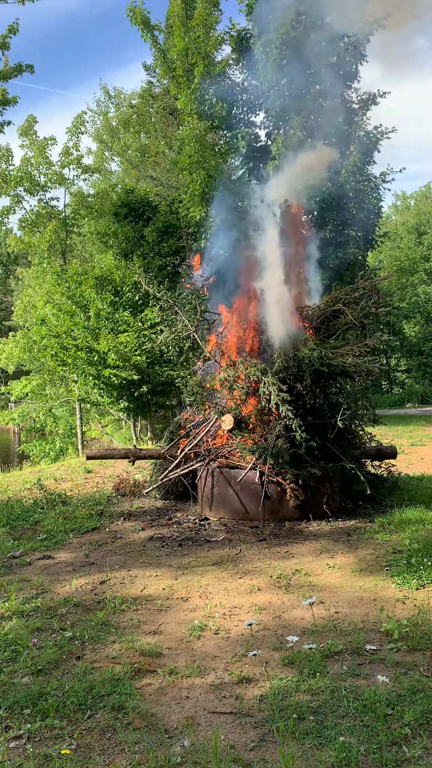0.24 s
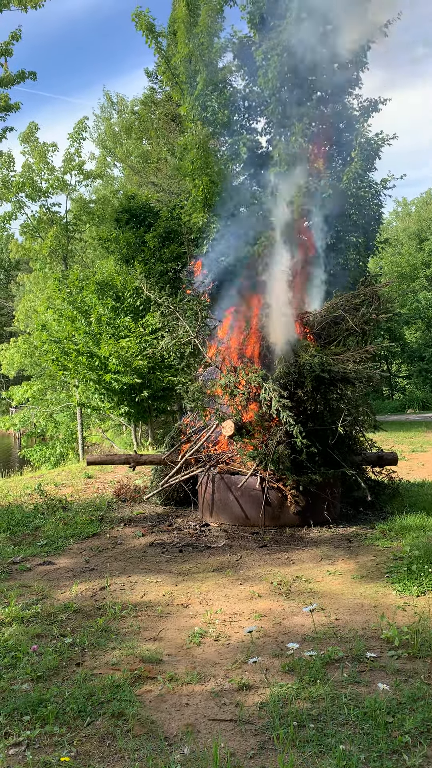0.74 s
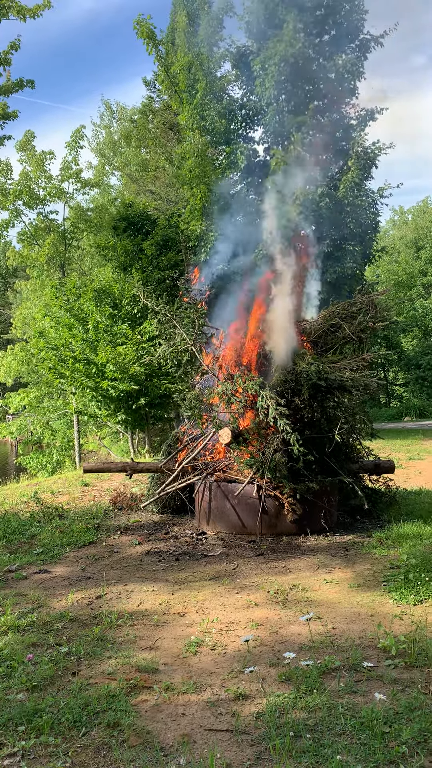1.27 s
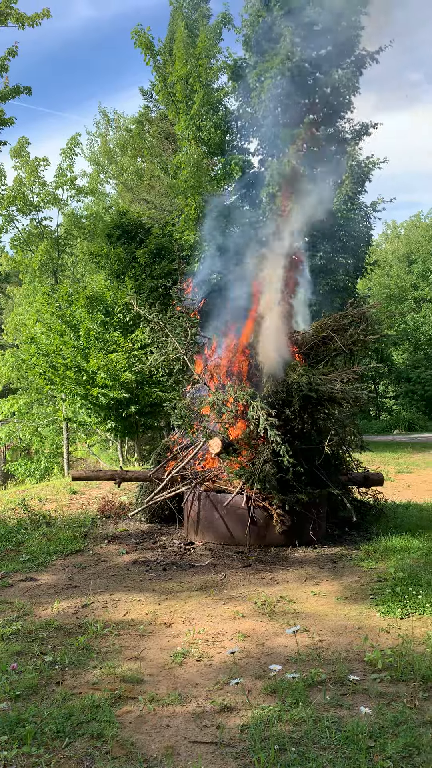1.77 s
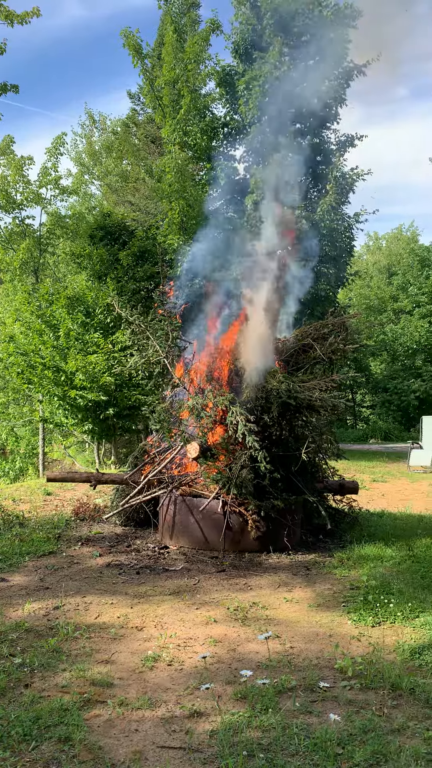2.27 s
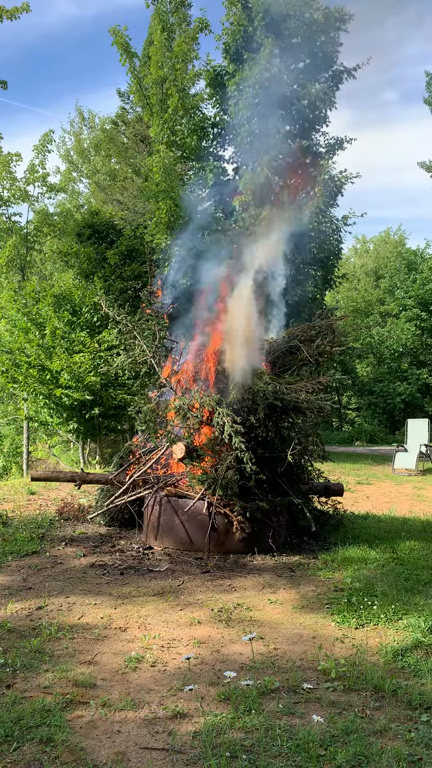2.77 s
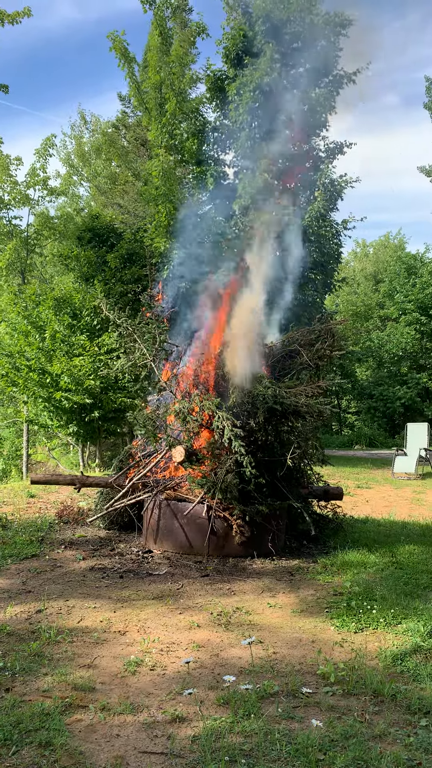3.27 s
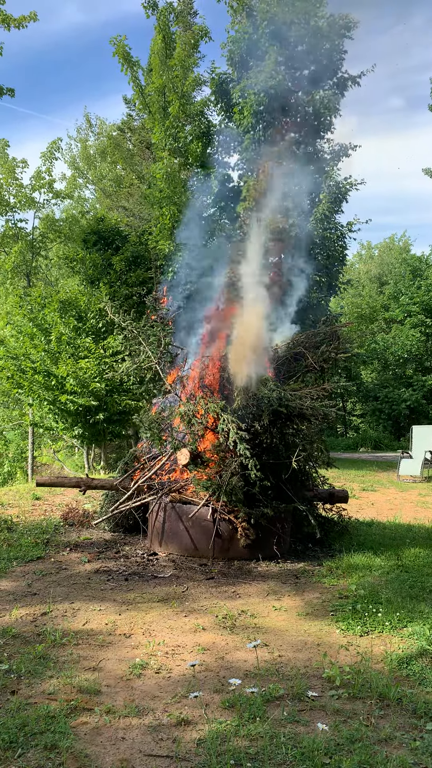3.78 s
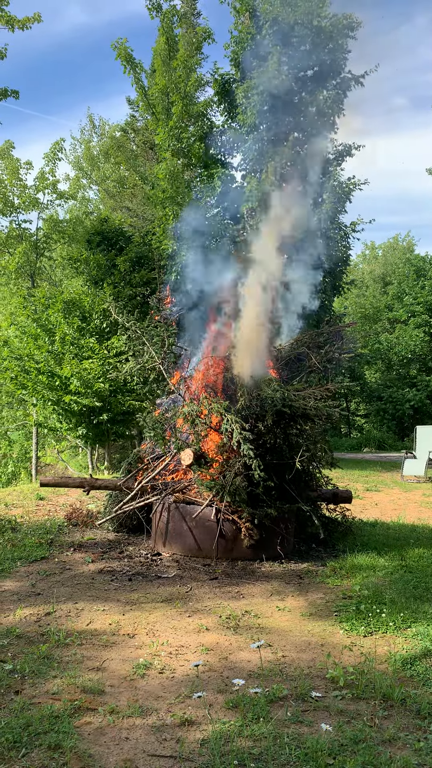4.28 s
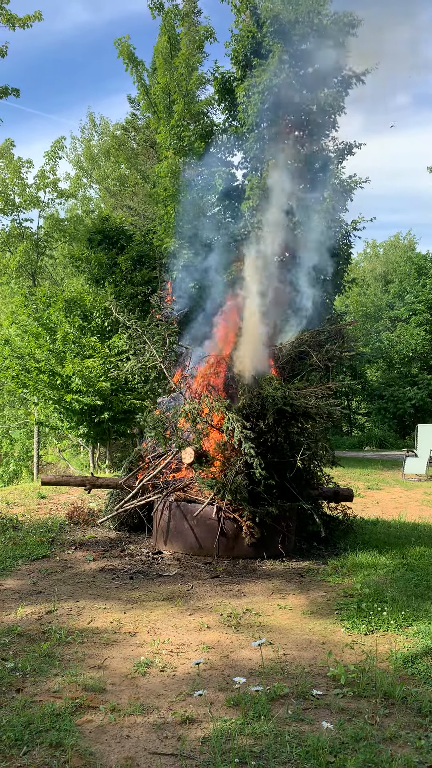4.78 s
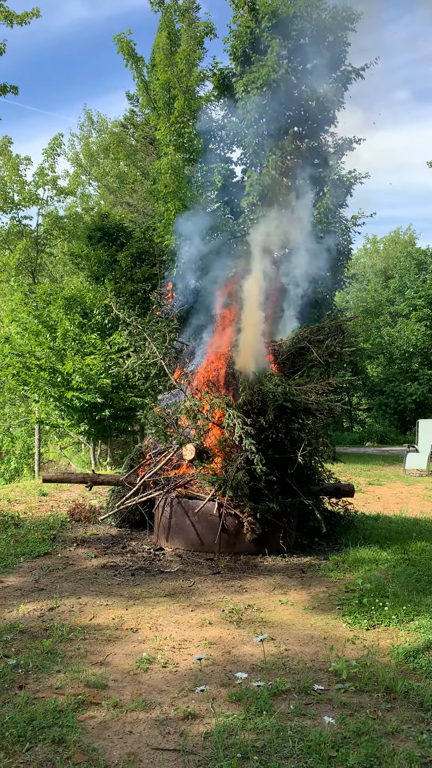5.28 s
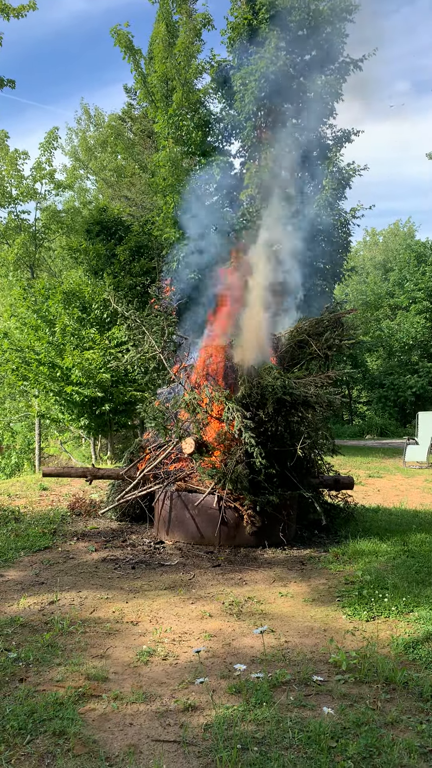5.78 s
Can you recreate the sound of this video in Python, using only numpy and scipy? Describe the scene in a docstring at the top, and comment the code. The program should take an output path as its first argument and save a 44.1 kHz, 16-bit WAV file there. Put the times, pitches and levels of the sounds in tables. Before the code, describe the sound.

Dense, bright crackling and sharp twig snaps come from an outdoor brush fire, with a soft, low rush of flames underneath.

```python
"""A tall pile of green brush burns on open ground, several metres away, for six seconds.
From the start the flames make a low, surging rush under a dense, bright crackle of bursting needles
and sizzling sap. Twigs snap all the way through as their fibres tear. Near 3 s comes a lower-pitched
crack, and at 3.7 s a thick stick gives the loudest woody pop. Every crack scatters in the pile and
bounces off the ground on its way to a pair of close microphone ports."""
import sys
import numpy as np
from scipy import signal
from scipy.fft import rfft, irfft, next_fast_len
from scipy.io import wavfile

SR = 44100
rng = np.random.default_rng(int(sys.argv[2]) if len(sys.argv) > 2 else 0)


def transcribe(signal):
    """Save signal, clipped to [-1, 1], as a 16-bit WAV file at the path in sys.argv[1]."""
    frames = np.atleast_2d(signal).T
    limited = np.clip(frames, -1, 1)
    pcm = np.round(limited * 32767).astype(np.int16)
    wavfile.write(sys.argv[1], SR, pcm)


N = 265878
TIME = np.arange(N) / SR
FFT_SIZE = next_fast_len(N + 4096)
HZ = np.maximum(np.arange(FFT_SIZE // 2 + 1) * SR / FFT_SIZE, 1)

# The tone of the flames. Each row: frequency in Hz, relative level in dB.
RUSH_EQ = [(12, -31), (20, -30), (32, -23), (45, -5), (72, 1.5), (105, -0.6), (165, -3.5), (280, -9.0),
           (430, -15.5), (720, -13), (950, -18.5), (1500, -27.5), (2600, -28.5), (16000, -59)]
# Loudness of the background crackle bed, with swells, lulls and brief dips just before some sharp snaps.
# Each row: time in seconds, relative level in dB.
BED_LEVEL = [(0.0, -36.5), (0.18, -39), (0.39, -36), (0.45, -40), (0.48, -37), (0.57, -36), (0.63, -42),
             (0.7, -35.5), (0.81, -43), (0.84, -35.5), (1.33, -36.5), (1.42, -36.5), (1.48, -38),
             (1.54, -41), (1.6, -36), (1.71, -37), (1.74, -39.5), (1.84, -35), (1.87, -39), (2.04, -33.5),
             (2.07, -36.5), (2.39, -35.5), (2.57, -38), (2.6, -34), (2.65, -37.5), (2.81, -35), (2.87, -38),
             (2.99, -32), (3.1, -38), (3.32, -34), (3.37, -40.0), (3.52, -33.5), (3.55, -37.5), (3.7, -36),
             (3.82, -40.5), (3.93, -38), (3.97, -35), (4.19, -36), (4.33, -35.5), (4.71, -37),
             (4.79, -34.5), (4.94, -36.5), (5.01, -44), (5.04, -35), (5.16, -39), (5.33, -35.5),
             (5.47, -39), (5.51, -35.5), (5.85, -35.5), (5.88, -41.5), (5.94, -35), (6.03, -34)]
# The featured snaps. Each row: time in seconds, relative crack level in dB, crack pitch in Hz,
# relative knock level in dB, fracture length in seconds.
SNAP_CUES = [(0.0347, -28, 7000, -54, .00015), (0.0853, -27.5, 12500, -48, .0009),
             (0.1042, -29.5, 12000, -54, .0001), (0.218, -27, 13000, -39, 0.00034),
             (.245, -28, 14000, -48, .0005), (0.4627, -24, 10500, -44, .00007),
             (0.4712, -23, 10500, -41, .0001), (0.55, -30, 11000, -45, .0014),
             (0.693, -24, 14500, -47, .00009), (0.8304, -21, 9500, -44, 0.00013),
             (0.8368, -24.5, 8500, -48, 0.00033), (.8518, -27, 10000, -49, .0002),
             (0.8622, -24, 13000, -37, 0.00033), (0.8913, -26.5, 9000, -48, .0002),
             (0.9739, -24.5, 9000, -38, 0.00043), (1.1004, -25.5, 6500, -42, .00012),
             (1.1733, -19.5, 7500, -45, .00008), (1.1907, -26, 9000, -43, .00012),
             (1.317, -28, 9500, -49, .002), (1.3673, -18.5, 14000, -46, .00008),
             (1.3824, -29, 10500, -52, .0008), (1.392, -25, 10000, -35.5, .0012),
             (1.426, -24.5, 6500, -35, .0016), (1.453, -27, 12000, -48, .0008),
             (1.5584, -19.5, 14500, -45, 0.00019), (1.5925, -23.5, 13000, -50, .0002),
             (1.6105, -27, 8000, -45, .0005), (1.6983, -26.5, 9000, -49, .00015),
             (1.711, -26, 8500, -47, .0014), (1.7619, -27.5, 7000, -49, .0005),
             (1.7905, -27, 11000, -50, .0002), (1.8183, -26, 8000, -32, 0.0015),
             (1.899, -25.5, 8000, -52, .0007), (1.9394, -28, 10000, -51, .0005),
             (1.9507, -24.5, 8500, -41, .0016), (1.9972, -26, 12500, -48, .0002),
             (2.0226, -21, 12500, -35, 0.00028), (2.0546, -27.5, 11500, -48, .0014),
             (2.136, -27, 9500, -53, .0002), (2.1731, -24, 11500, -48, .0005),
             (2.1814, -28, 12000, -44, .0004), (2.1968, -27, 6500, -45, .0005),
             (2.2183, -24, 12000, -43, 0.00032), (2.2263, -31, 8500, -44, .0008),
             (2.2514, -21.5, 10000, -48, 0.002), (2.264, -28, 10500, -50, .0009),
             (2.3, -22.5, 12000, -45, .0003), (2.323, -26, 10500, -42, .002),
             (2.3886, -26, 12500, -51, .0001), (2.3973, -29, 10000, -50, .0003),
             (2.5707, -27, 10000, -47, .0002), (2.6174, -26, 10000, -51, .0003),
             (2.7042, -28, 9500, -41, .0008), (2.7438, -27.5, 10000, -45, .00015),
             (2.8219, -26.5, 11000, -40, .0007), (2.8347, -27.5, 10000, -42, 0.00088),
             (2.9093, -28.5, 11000, -48, 0.00057), (2.9655, -18, 4170, -35, .0014),
             (2.969, -23, 13500, -49, 0.00034), (2.9896, -28.5, 8500, -44, .002),
             (3.008, -29, 10500, -43, .0014), (3.0935, -27.5, 9000, -49, .0009),
             (3.2789, -26.5, 6000, -42, 0.00022), (3.3226, -25.5, 9000, -45, .0005),
             (3.4052, -26, 9000, -37, .0004), (3.5034, -26, 7500, -40, .0008),
             (3.6829, -20, 10500, -39, 0.0031), (3.711, -22.5, 4200, -23, .0009),
             (3.7496, -28.5, 11000, -45, .0005), (3.9064, -26.5, 12500, -57, .0009),
             (3.945, -19.5, 14500, -49, .00006), (3.9741, -28, 7500, -40, .0008),
             (3.9835, -21, 3500, -34, 0.00034), (4.0176, -25, 13000, -46, .0005),
             (4.0357, -23, 11500, -41, .00007), (4.0807, -26, 10000, -45, .0008),
             (4.157, -36, 6500, -33, .0004), (4.237, -27.5, 6000, -46, .0001),
             (4.2964, -25.5, 7500, -53, 0.000088), (4.313, -31, 7000, -31.5, .0004),
             (4.3354, -24.5, 13000, -50, 0.00066), (4.5903, -27.5, 12000, -49, .0004),
             (4.6246, -25, 14000, -52, .00007), (4.678, -25.5, 11000, -46, .0001),
             (4.7852, -23.5, 7500, -46, .0002), (4.8888, -26.5, 9000, -45, .0002),
             (5.0398, -26.5, 10000, -46, 0.00058), (5.13, -26.5, 10000, -42, .0001),
             (5.1537, -27.5, 8500, -48, .0002), (5.3966, -29, 12000, -50, .0005),
             (5.479, -27, 8000, -33.5, .0002), (5.5079, -23.5, 8000, -37.5, .0003),
             (5.5207, -27, 12500, -48, .0001), (5.5592, -28, 11000, -53, .0005),
             (5.63, -26, 8500, -44, .0005), (5.6868, -26.5, 10500, -45, .0014),
             (5.7049, -24.5, 8000, -40, 0.0005), (5.71, -21.5, 11000, -46, .0001),
             (5.7673, -27, 12500, -47, .0005), (5.8252, -26, 9050, -48, .00015),
             (5.8992, -25, 11000, -39.5, .00008), (5.9424, -27, 8000, -44, .0012)]
# The damped modes of a bursting stick. Each row: multiple of its middle pitch, Q, relative level in dB.
STICK_MODES = [(0.47, 2.6, -4), (0.73, 1.6, 1.2), (1.68, 1.7, 0.3)]
# The tone of the bright crackle. Each row: frequency in Hz, relative level in dB.
CRACKLE_EQ = [(150, -31), (500, -14.5), (1100, -12.5), (2000, -9), (3000, -10), (4250, -9), (4650, -4),
              (7700, -4.5), (8250, -1), (10000, -2), (15500, -2.5)]
# The bounce off soil and grass. Each row: frequency in Hz, level in dB against the direct sound.
GROUND_EQ = [(100, -10), (1200, -7), (3000, -21.5), (6000, -15), (15000, -17)]
# The sound arriving from all around. Each row: frequency in Hz, gain in dB against the front.
DIFFUSE_EQ = [(100, -38.5), (250, -15.5), (700, -14), (950, -4.5), (1300, -15.5), (1850, -13), (2250, -5),
              (2800, -6), (3800, -2), (4600, -18), (15000, -14)]
# How far the right port trails the left. Each row: frequency in Hz, phase lag in radians.
PORT_LAG = [(0, 0), (1600, 0), (2000, .45), (2300, 2.21), (2700, 1.55), (3500, 1.53), (4000, 2.15),
            (4300, 2.9), (4900, 3.34), (6200, 5.45), (7000, 6.39), (8900, 9.4), (10700, 12.21),
            (13200, 15.73), (15700, 19.22)]


def from_db(db):
    """Decibels to gain."""
    return 10 ** (np.asarray(db) / 20)


def rms_one(x):
    """Scale to an rms of 1."""
    return x / np.sqrt(np.mean(x ** 2) + 1e-20)


def eq_curve(points):
    """Gain at every frequency from (Hz, dB) points."""
    hz, db = np.transpose(points)
    return from_db(np.interp(np.log(HZ), np.log(hz), db))


def filtered(x, gain):
    """Pass a signal through a frequency response."""
    return irfft(rfft(x, FFT_SIZE) * gain, FFT_SIZE)[..., :N]


def smear(power, decay_s):
    """Spread energy into an exponential tail, keeping its sum."""
    pole = np.exp(-1 / (decay_s * SR))
    return signal.lfilter([1 - pole], [1, -pole], power + 1e-18)


def drift(rate_hz):
    """A smooth random wander with an rms of 1."""
    return rms_one(filtered(rng.standard_normal(FFT_SIZE), 1 / (1 + (HZ / rate_hz) ** 2)))


def resonance(x, hz, q):
    """A damped ring."""
    return signal.lfilter(*signal.iirpeak(min(hz, SR / 3), max(q, 1), fs=SR), x + 1e-18)


def hollow(x, hz, q):
    """A broad ring with steep flanks."""
    return resonance(resonance(x, hz, q), hz, q)


def low_cut(x, corner_hz):
    """Thin out the low end: a quick fracture radiates little bass."""
    return signal.lfilter(*signal.butter(1, min(corner_hz, SR / 3), "high", fs=SR), x)


def flame_rush():
    """Turbulent flames lay a soft, low noise that surges; rows are front and diffuse sound."""
    turbulence = rms_one(filtered(rng.standard_normal((2, FFT_SIZE)), eq_curve(RUSH_EQ)))
    surge_db = 1.18 * drift(rate_hz=6.7)
    return from_db(-43.5 + surge_db) * turbulence


def bursts(per_s, spread_db, top_db):
    """Energy of bursts at random moments: many small ones, few large."""
    sizes_db = top_db - np.abs(top_db - spread_db * rng.standard_normal(N))
    return (rng.random(N) < per_s / SR) * from_db(sizes_db) ** 2


def splinters(count, spiky_db):
    """Gritty noise: tiny fractures of very uneven strength."""
    return rng.standard_normal(count) * from_db(spiky_db * np.minimum(rng.standard_normal(count), 2.6))


def fracture_runs(per_s, fade_s, spiky_db):
    """A rustle made of runs of tiny fractures; each run swells, then dies."""
    dying = smear(bursts(per_s, spread_db=7.5, top_db=7.0), fade_s)
    power = smear(dying[::-1], decay_s=0.0004)[::-1]  # a reversed tail softens the attack
    return rms_one(np.sqrt(power) * splinters(N, spiky_db))


def burning_foliage(flurry):
    """Foliage bursts in flurries: a thin rustle of needles, a duller one of twigs, and single ticks."""
    needles = fracture_runs(250 * flurry, fade_s=0.0016, spiky_db=5.5)
    twigs = fracture_runs(230 * flurry, fade_s=0.0011, spiky_db=3.0)
    tick_power = smear(bursts(170 * flurry, spread_db=5.0, top_db=4.5), decay_s=0.00005)
    ticks = np.sqrt(tick_power) * rng.standard_normal(N)
    return (from_db(-3.3) * rms_one(low_cut(needles, corner_hz=2820))
            + from_db(-6.8) * rms_one(resonance(twigs, hz=3850, q=1.5))
            + from_db(-5.0) * rms_one(low_cut(ticks, corner_hz=6000)))


def sap_pops(flurry):
    """Sap pockets of many sizes burst, each size with a pitch of its own."""
    pitches_hz = np.geomspace(950, 4000, num=8)
    pocket = rng.integers(0, len(pitches_hz), N)
    kicks = np.sqrt(bursts(520 * flurry, spread_db=7.0, top_db=11.0)) * rng.choice([-1, 1], N)
    return rms_one(sum(resonance(kicks * (pocket == k), hz, q=3.3) * np.sqrt(pitches_hz[0] / hz)
                       for k, hz in enumerate(pitches_hz)))


def small_snap_cues(per_s):
    """Thin twigs give way at random moments, their levels following the bed; rows as in SNAP_CUES."""
    crack_dice, knock_dice, length_dice, pitch_dice = rng.standard_normal((200, 4)).T
    times = np.cumsum(rng.exponential(1 / per_s, len(crack_dice)))
    bed_db = np.interp(times, *np.transpose(BED_LEVEL))
    crack_db = bed_db + 6 + 1.3 * crack_dice
    crack_hz = 8400 * 2 ** (0.5 * pitch_dice)
    knock_db = bed_db - 10.5 + 2 * knock_dice
    length_s = 0.0007 * 2 ** (1.6 * length_dice)
    return np.column_stack([times, crack_db, crack_hz, knock_db, length_s])[times < N / SR]


def twig_crack(fracture, age_s, length_s, hz):
    """The bright edge of a snap: fibres tear and ring; the last one's tick dominates a quick break."""
    tick = rms_one(1.0 * (age_s == 0)) * rng.choice([-1, 1])
    last_fibre = from_db(7.0) / (1 + length_s / 0.00011) * tick
    crack = low_cut(fracture + last_fibre, corner_hz=5450 / (1 + length_s / 0.00021))
    return rms_one(crack + from_db(4.0) * resonance(crack, hz, q=1.13))


def wood_knock(fracture, crack_over_knock_db):
    """The body of a snap: the more a stick knocks rather than cracks, the thicker and lower it is."""
    thick_hz, thin_hz, db_per_octave = 1650, 2620, 52
    middle_hz = min(thick_hz * 2 ** (crack_over_knock_db / db_per_octave), thin_hz)
    return rms_one(sum(from_db(db) * rms_one(hollow(fracture, middle_hz * ratio, q))
                       for ratio, q, db in STICK_MODES))


def snapping_twigs():
    """Each break drives a crack and a knock from one fracture; the two come back as separate layers."""
    cracks, knocks = np.zeros((2, N + SR))
    offsets = np.arange(-256, 512)
    age_s = offsets / SR
    gain = from_db(-1.5) * np.sqrt(0.004 * SR / len(offsets))  # levels count a snap's energy over 4 ms
    for time_s, crack_db, crack_hz, knock_db, length_s in [*SNAP_CUES, *small_snap_cues(per_s=10)]:
        length_s = max(length_s, 2 / SR)
        slope_s = length_s * np.where(age_s < 0, 0.35, 0.9)  # fast attack, slower release
        envelope = np.exp(-np.abs(age_s) / slope_s)
        fracture = rms_one(splinters(len(offsets), spiky_db=8.0) * envelope)
        at = round(time_s * SR) + offsets
        cracks[at] += gain * from_db(crack_db) * twig_crack(fracture, age_s, length_s, crack_hz)
        knocks[at] += gain * from_db(knock_db) * wood_knock(fracture, crack_db - knock_db)
    rumble_cut = signal.butter(4, 480, "high", fs=SR, output="sos")
    return cracks[:N], signal.sosfilt(rumble_cut, knocks[:N])


def scattered(cracks):
    """The pile's branches and the trees give cracks a grainy tail; rows are front and diffuse sound."""
    power = cracks ** 2
    pile = from_db(-13.0) ** 2 * smear(power, decay_s=0.4)
    trees = from_db(-26.0) ** 2 * smear(power, decay_s=0.04)
    front = cracks + np.sqrt(pile + trees) * rms_one(splinters(N, spiky_db=4.0))
    diffuse = np.sqrt(smear(power, decay_s=0.0013) + pile + trees) * rng.standard_normal(N)
    return np.array([front, diffuse])


def tree_reflections(wood):
    """Knocks and pops come back from the trees as a hollow tail; rows are front and diffuse sound."""
    envelope = np.sqrt(smear(wood ** 2, decay_s=0.012))
    return envelope * rms_one(hollow(rng.standard_normal((2, N)), hz=1310, q=1.0))


def crackle():
    """A bed of foliage and sap swells and dips under the snaps; rows are front and diffuse sound."""
    cracks, knocks = snapping_twigs()
    flurry = from_db(0.8 * drift(rate_hz=26))  # bunches the small bursts a little
    foliage = burning_foliage(flurry)
    pops = from_db(-15.5) * sap_pops(flurry)
    sizzle = from_db(-16.5) * rng.standard_normal(N)
    bed_gain = from_db(np.interp(TIME, *np.transpose(BED_LEVEL)) + 0.28)
    bright = scattered(bed_gain * (foliage + sizzle) + cracks)
    bright = from_db(1.5) * filtered(bright, rms_one(eq_curve(CRACKLE_EQ)))
    wood = knocks + bed_gain * pops
    front_only = [[1], [0]]
    return bright + wood * front_only + from_db(-11.5) * tree_reflections(wood)


def ground_bounce(x, delay_s):
    """Soil and grass return a late, softer copy that comb-filters the fire."""
    return filtered(x, 1 + eq_curve(GROUND_EQ) * np.exp(-2j * np.pi * HZ * delay_s))


def microphone_ports(front, diffuse):
    """The treble reaches the left port first; diffuse sound adds width in opposite polarity."""
    diffuse_gain = eq_curve(DIFFUSE_EQ)
    side = filtered(diffuse, diffuse_gain)
    lag = np.exp(-1j * np.interp(HZ, *np.transpose(PORT_LAG)))
    ports = np.array([front + side, filtered(front - side, lag)])
    return filtered(ports, 1 / np.sqrt(1 + diffuse_gain ** 2))


def scene():
    """Crackle and flames bounce off the ground and arrive in stereo."""
    front, diffuse = ground_bounce(crackle() + flame_rush(), delay_s=0.00173)
    return microphone_ports(front, diffuse)


def record(dry):
    """A steep high cut takes off the air above 16 kHz."""
    return signal.sosfilt(signal.ellip(10, 0.2, 70, 16000, fs=SR, output="sos"), dry)


dry = scene()
out = record(dry)
transcribe(out)
```